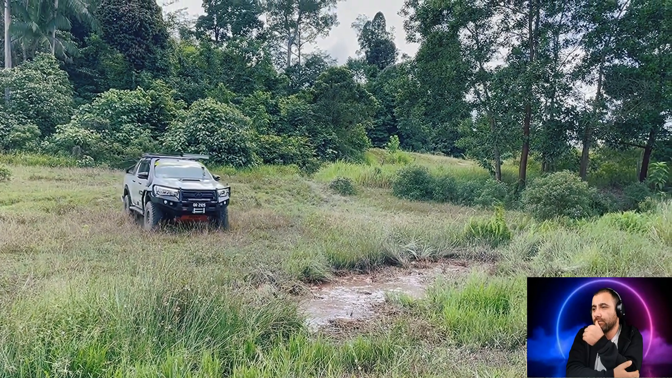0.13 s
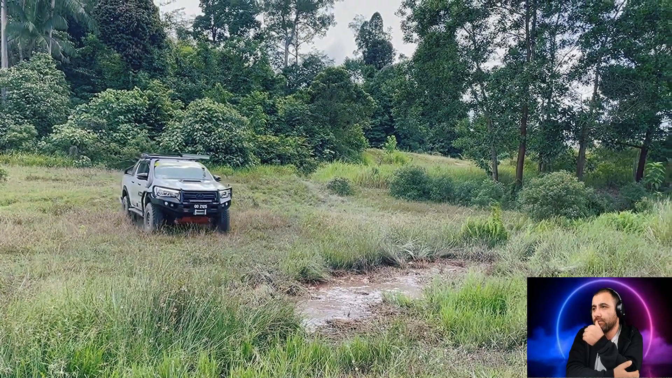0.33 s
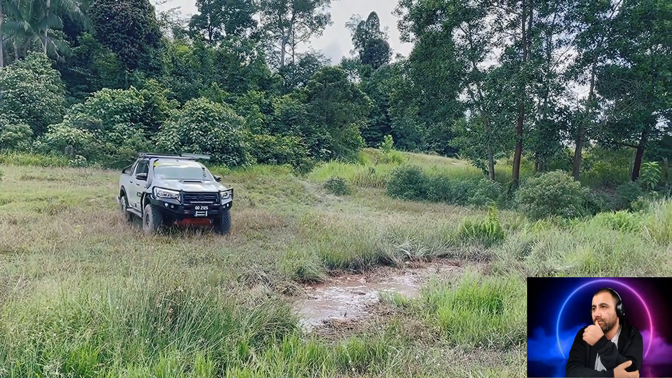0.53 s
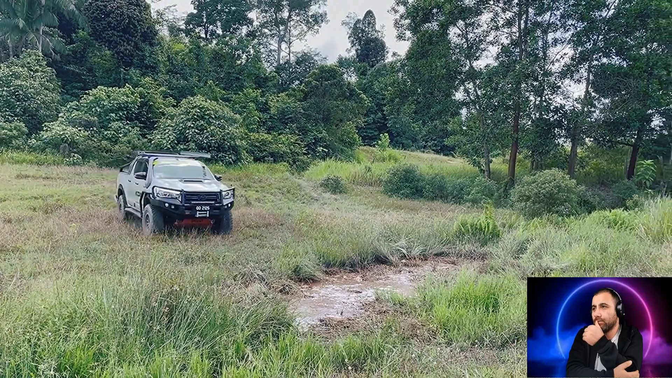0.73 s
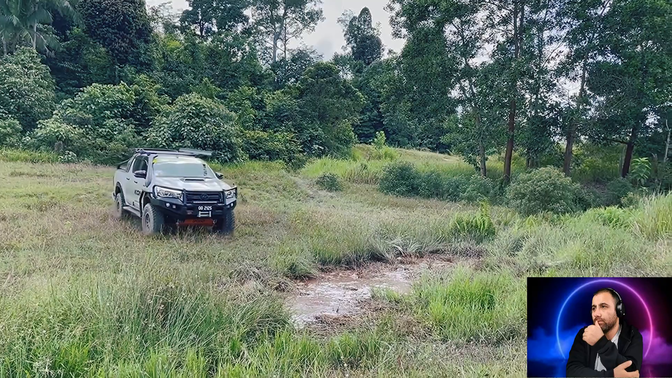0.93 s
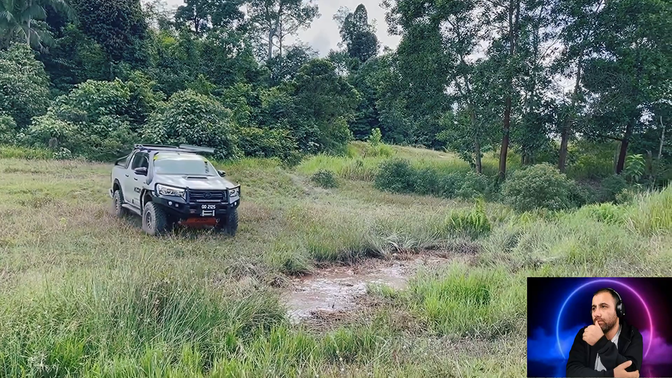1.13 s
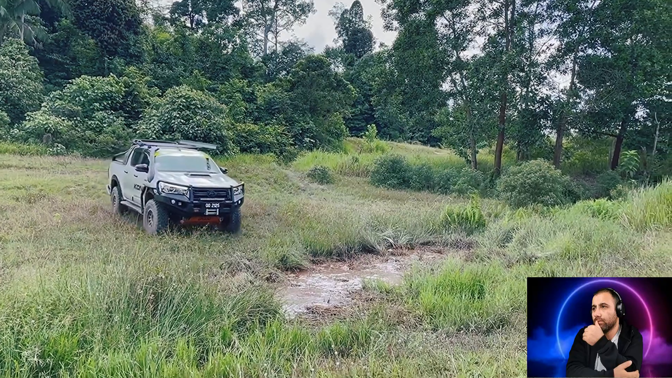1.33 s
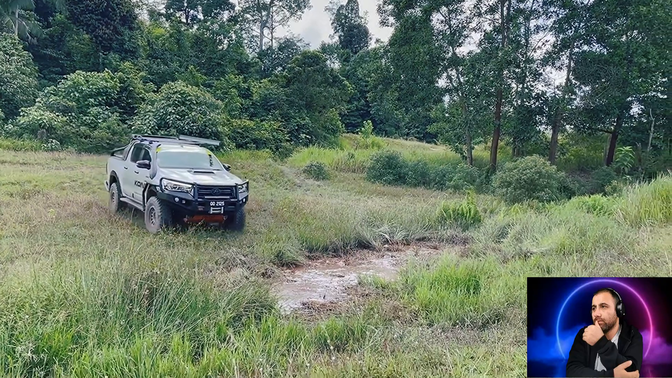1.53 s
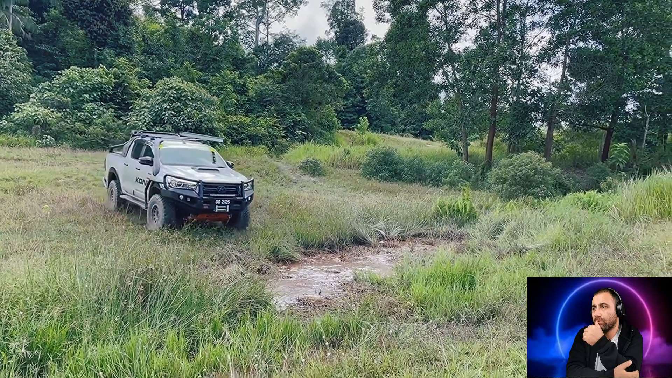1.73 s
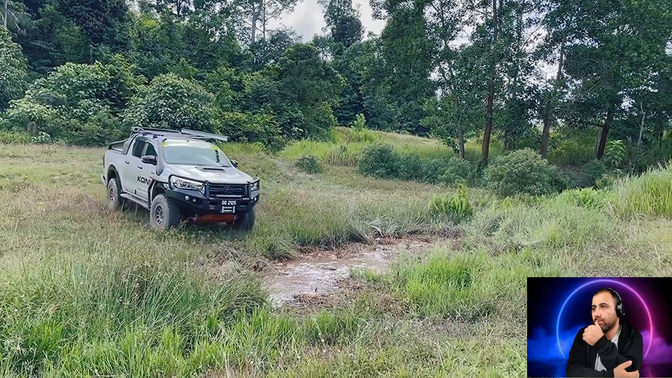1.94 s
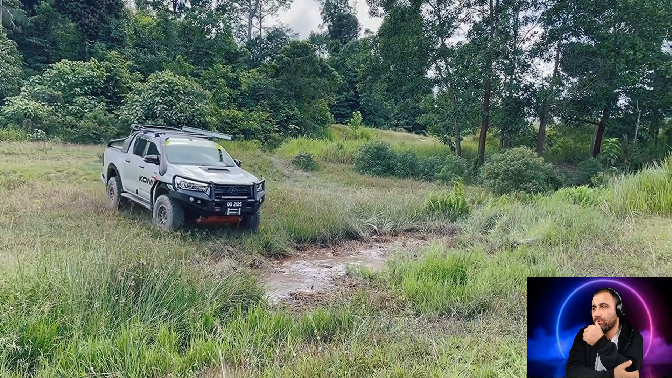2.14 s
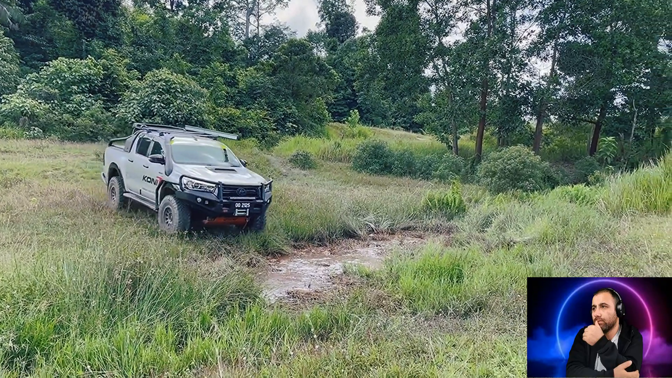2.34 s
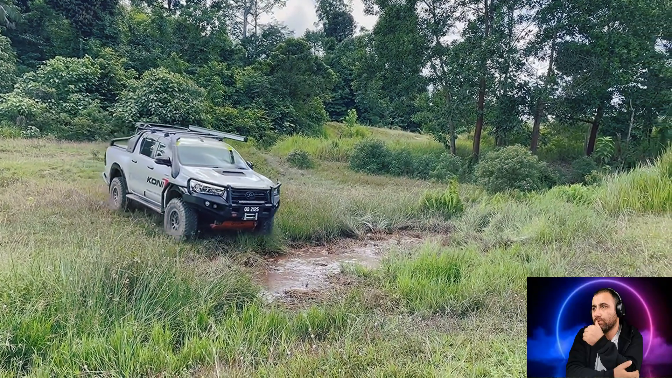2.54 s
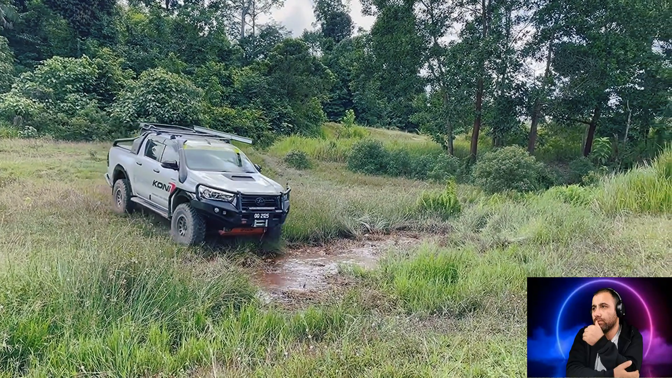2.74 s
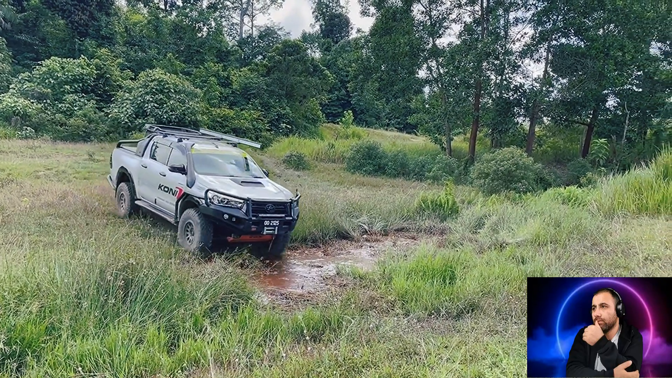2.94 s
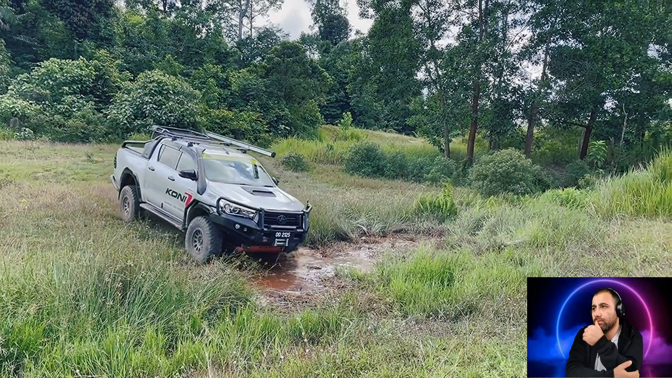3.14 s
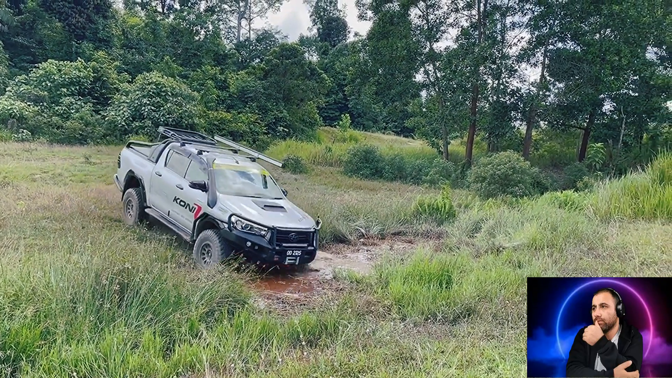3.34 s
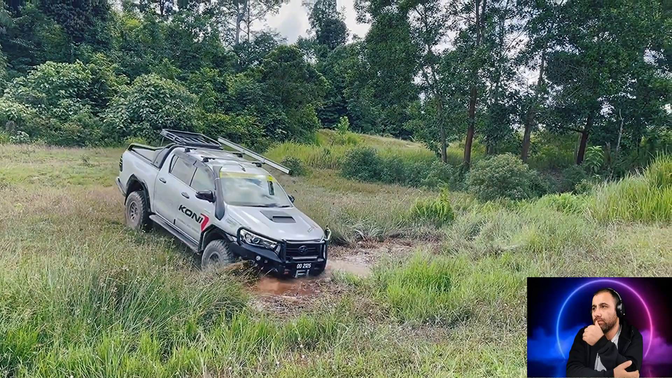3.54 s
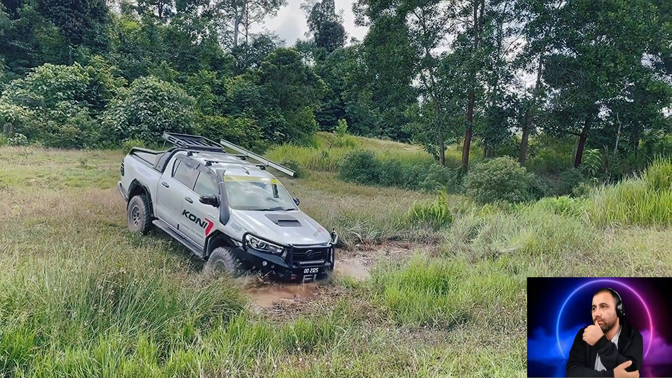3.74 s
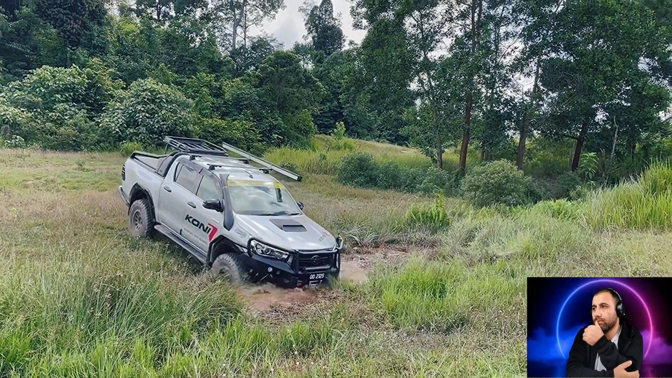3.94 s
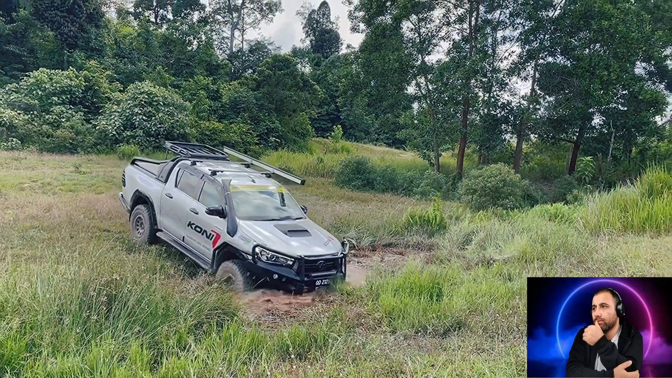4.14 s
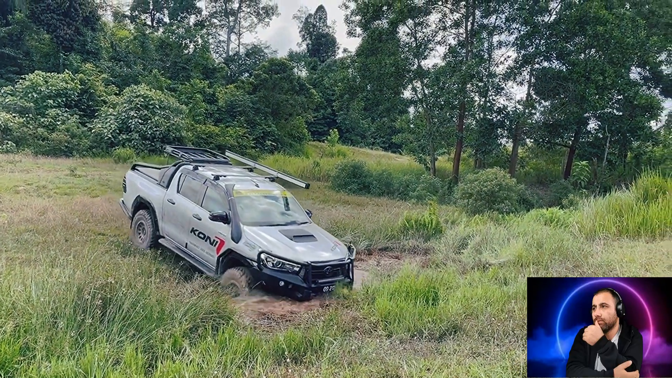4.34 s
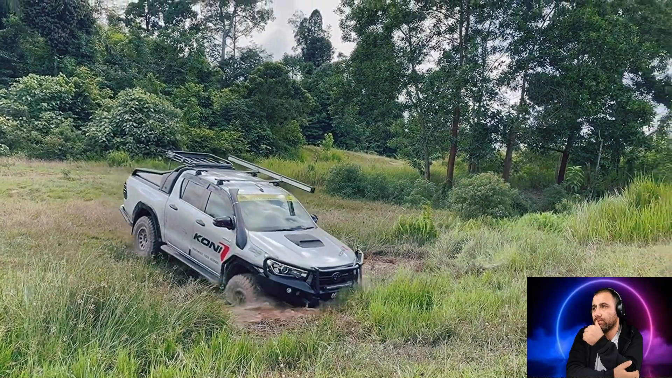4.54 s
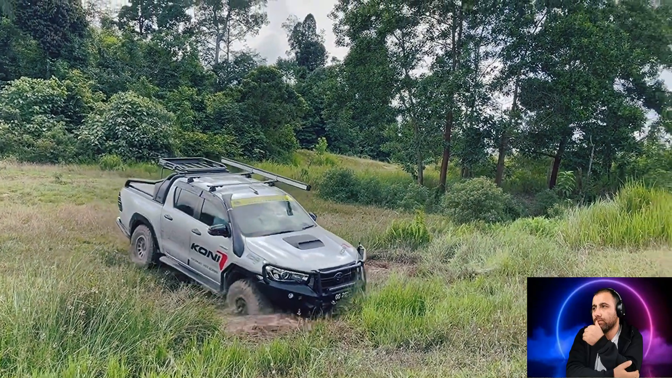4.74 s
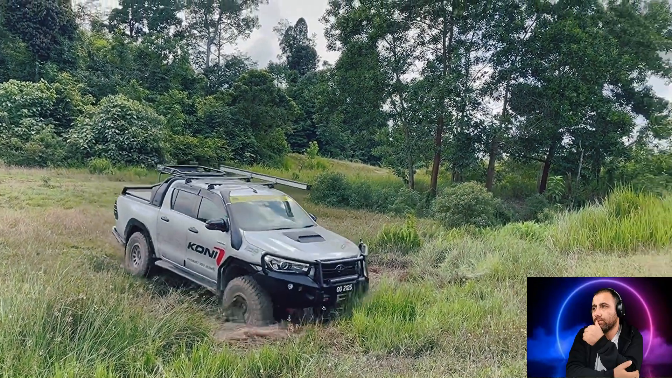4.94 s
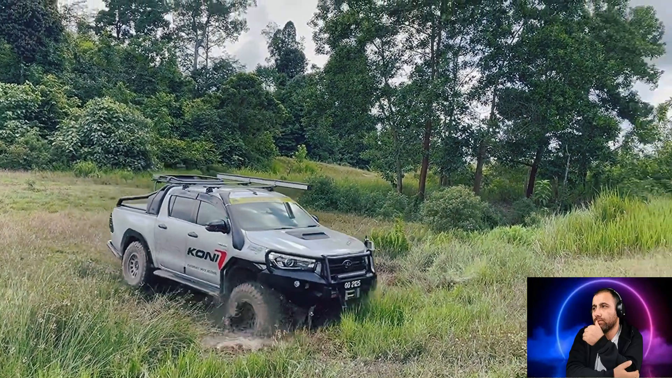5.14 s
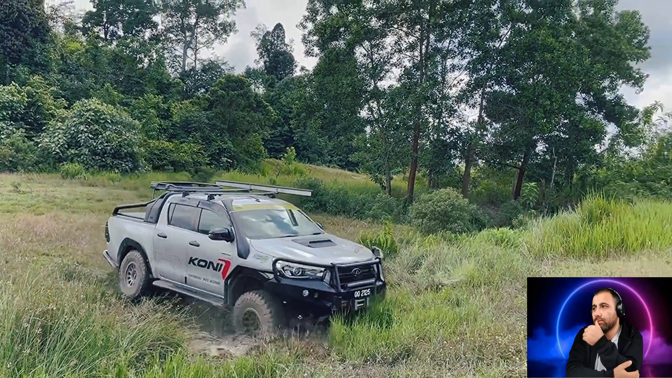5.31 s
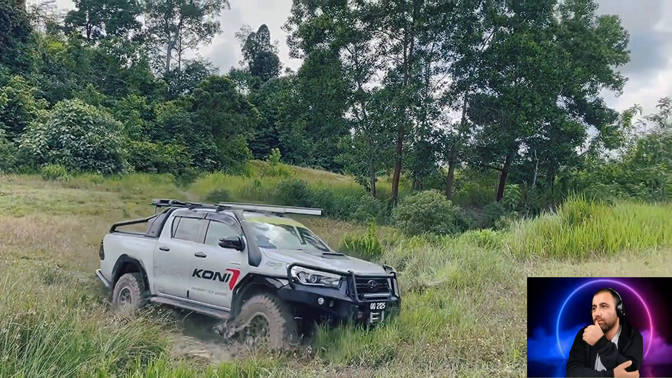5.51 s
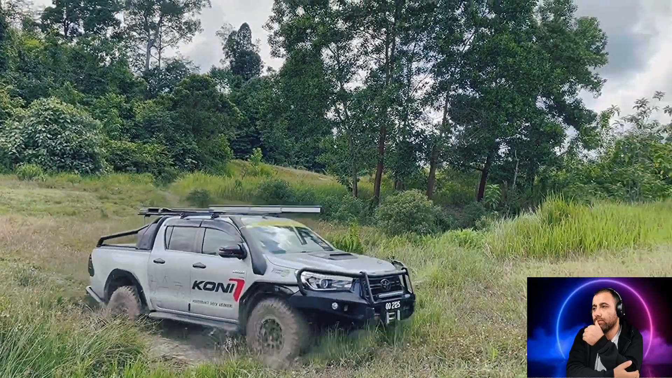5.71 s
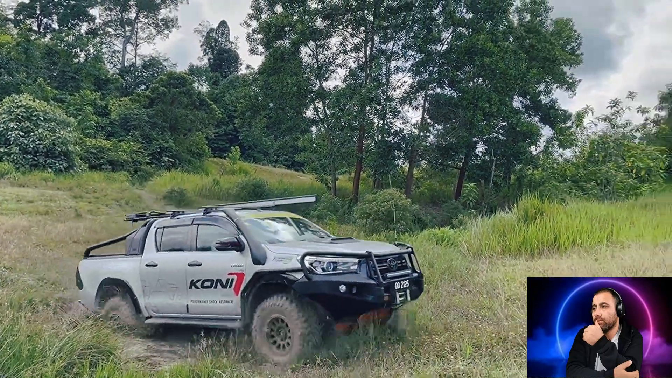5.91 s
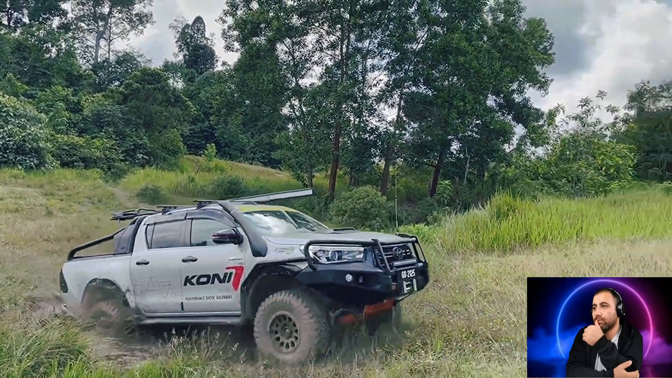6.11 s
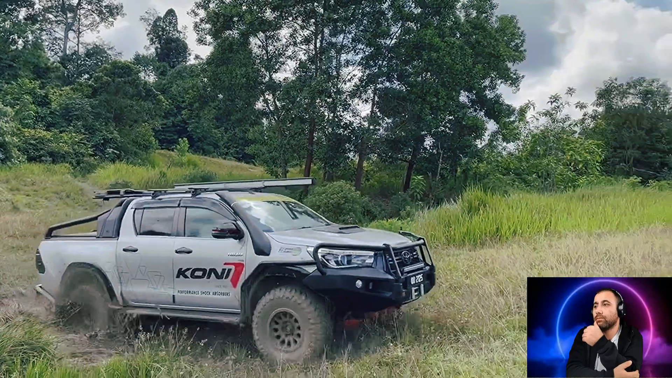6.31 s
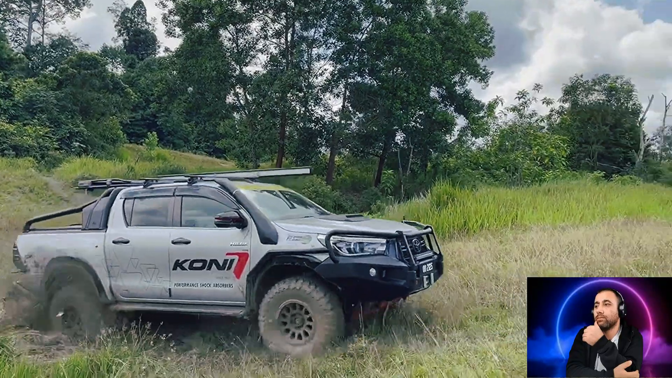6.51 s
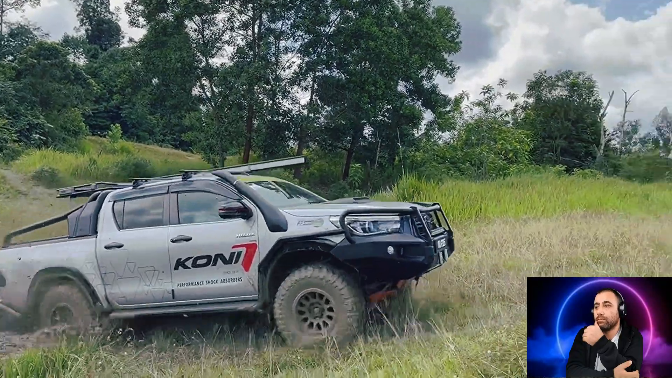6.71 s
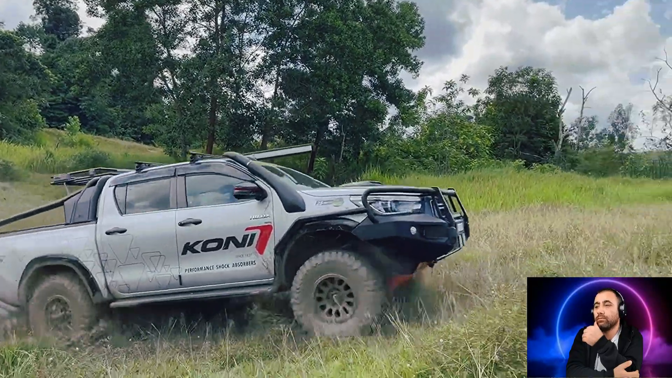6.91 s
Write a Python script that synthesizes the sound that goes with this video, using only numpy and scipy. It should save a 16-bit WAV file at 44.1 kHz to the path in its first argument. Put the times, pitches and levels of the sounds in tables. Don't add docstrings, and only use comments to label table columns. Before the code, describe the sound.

A phone in open grass picks up a distant diesel ticking and knocking, revving gently and settling. Around three seconds sharp muddy smacks and watery spatter break in, followed by a dull axle knock. The motor labours, then revs hard into a deep, uneven roar, growing far louder and nearer. Wet wash, spray and bright grassy hiss surround it, with a cluster of low thumps near the end and no reverberant room.

```python
import sys
import numpy as np
from scipy import signal
from scipy.fft import rfft, irfft, next_fast_len
from scipy.io import wavfile
from scipy.ndimage import uniform_filter1d, map_coordinates

SR = 44100
rng = np.random.default_rng(int(sys.argv[2]) if len(sys.argv) > 2 else 0)


def to_wav(sig):
    pcm = np.clip(np.atleast_2d(sig), -1, 1) * 32767
    pcm = np.round(pcm).astype(np.int16)
    wavfile.write(sys.argv[1], SR, pcm.T)


def gain_from_db(level_db):
    decades = np.asarray(level_db, float) / 20
    return 10 ** decades


N = 307022

IDLE_HZ, IDLE_DB = 52, -45
# start in seconds, peak in dB, t60 in seconds.
SLAPS = [
    (3.021, -16.5, 0.036),
    (3.071, -17, 0.032),
    (3.247, -12, 0.053),
    (3.419, -17, 0.057),
    (3.499, -20, 0.053),
    (3.618, -31, 0.043),
    (3.81, -19, 0.036),
    (4.902, -31, 0.046),
]


def unit(x):
    return x / np.sqrt(np.mean(x ** 2) + 1e-20)


def along(points, hz):
    f, v = np.transpose(points)
    return np.interp(np.log(hz + 1), np.log(f + 1), v)


def curves(rows):
    s, *cols = np.transpose(rows)
    return [np.interp(np.arange(N) / SR, s, c) for c in cols]


def wobble(rate_hz):
    knots = rng.standard_normal(int(N * rate_hz / SR) + 4)
    return map_coordinates(knots, [np.arange(N) * rate_hz / SR])


def filtered(x, response):
    m = next_fast_len(N + SR // 2)
    return irfft(rfft(x, m) * response(np.fft.rfftfreq(m, 1 / SR)), m)[..., :N]


def resonant(modes):
    def response(f):
        return sum((-1) ** k * gain_from_db(db) * 1j * f * w / (c * c - f * f + 1j * f * w)
                   for k, (c, w, db) in enumerate(modes))
    return response


def pair(patchy_db):
    # frequency in Hz, left-right likeness (0-1).
    likeness = [(60, 1), (130, 0.99), (290, 1), (640, 0.97), (1410, 0.94), (3100, 0.87), (6820, 0.59),
                (15000, 0.85)]
    hz, _, z = signal.stft(rng.standard_normal((2, N)), SR, nperseg=512)
    field = uniform_filter1d(rng.standard_normal(z.shape[1:]), size=6, axis=0)
    field = uniform_filter1d(field, size=12, axis=1)
    turn = np.arccos(np.clip(along(likeness, hz), -1, 1))[:, None] / 2
    z = z * gain_from_db(patchy_db * unit(field)) * np.array([np.cos(turn), np.sin(turn)])
    mid, side = signal.istft(z, SR, nperseg=512)[1][:, :N]
    return np.array([mid + side, mid - side])


def coloured(x, spectrum):
    return unit(filtered(x, lambda hz: gain_from_db(along([(9.2, -90)] + spectrum, hz))))


def tone(hz, db, unsteady_db):
    level = gain_from_db(db + unsteady_db * wobble(12))
    return level * np.sqrt(2) * np.sin(2 * np.pi * np.cumsum(hz) / SR)


def law(rule, boom_hz, load_db):
    idle_db, db_per_octave, db_per_load_db = rule
    return idle_db + db_per_octave * np.log2(boom_hz / IDLE_HZ) + db_per_load_db * (load_db - IDLE_DB)


def lurches():
    # centre in seconds, boom change in dB, drone change in dB.
    lurch_rows = [
        (3.04, .5, 2.5),
        (5.23, 1, 0),
        (5.31, 1.5, -4),
        (5.66, 0, 5),
        (5.8, 1, 1),
        (5.96, 5.5, 2),
        (6.165, -5, -1),
        (6.26, -2.5, 6),
        (6.33, -5, .6),
        (6.88, 5, 8.5),
    ]
    width_s, t = 0.044, np.arange(N) / SR
    return sum(np.outer([boom_db, drone_db], np.exp(-((t - s) / width_s) ** 2))
               for s, boom_db, drone_db in lurch_rows)


def pulls():
    # start in seconds, end in seconds, start pitch in Hz, end pitch in Hz, level over the load in dB.
    pull_rows = [
        (.28, .72, 160, 195, -.5),
        (.72, 1.4, 197, 145, -4.5),
        (4.06, 4.79, 131, 180, -3),
        (4.95, 5.24, 256, 290, -6),
        (5.35, 7, 303, 280, -18),
    ]
    fade_s, t = 0.12, np.arange(N) / SR
    knots_s = [row[k] for row in pull_rows for k in (0, 1)]
    knots_hz = [row[k] for row in pull_rows for k in (2, 3)]
    hz = np.interp(t, knots_s, knots_hz)
    gain = sum(gain_from_db(db) * np.clip(np.minimum(t - start, end - t) / fade_s, 0, 1)
               for start, end, _, _, db in pull_rows)
    return hz, 20 * np.log10(gain + 1e-3)


def engine():
    # time in seconds, boom (twice the firing rate) in Hz, boom in dB, load heard as growl in dB.
    revs_load = [(0, 53.75, -48, -52.5), (.4, 65.5, -57, -42), (.75, 72.76, -63, -34.5),
                 (1.2, 63.5, -62, -38), (1.5, 52.68, -53, -44.5), (2.3, 51.9, -45.5, -45),
                 (3.05, 50.74, -49.5, -46.5), (3.85, 49.3, -49, -37), (4.5, 59.1, -37, -28),
                 (4.75, 70.26, -48, -27), (4.92, 85.2, -28.5, -24.5), (5.12, 97.1, -26.5, -24),
                 (5.33, 121.8, -21, -25), (5.62, 140.3, -21.5, -22), (5.97, 133, -19, -22),
                 (6.38, 115.3, -21.5, -20.5), (6.8, 114.4, -19.5, -21), (6.96, 96, -36, -20)]
    # time in seconds, pitch in Hz.
    hum_pitch = [(0, 71), (1, 70), (2.3, 75.74), (2.9, 76.2), (3.7, 68.66), (6.96, 67.92)]
    # time in seconds, effort (0-1).
    effort_rows = [(0, .6), (.3, 1), (1.1, 1), (1.65, 0), (2.95, 0), (3.2, .9), (6.96, 1)]
    # time in seconds, level in dB.
    block_swell = [(0, -6), (.45, 0.5), (1.1, 0), (1.4, -3), (1.6, 1), (2.8, 1), (3, -4.5), (3.2, 0), (6.6, 0),
                   (6.96, 7)]
    # frequency in Hz, level over the load in dB.
    octave_rows = [(105, -16), (145, -6), (200, -14), (270, -13)]
    # frequency in Hz, width in Hz, level in dB.
    cab_modes = [(49, 41, -11), (75.2, 14, -2.5), (116, 12, 0.5)]
    pipe_modes = [(153, 31.2, -1.5), (226.2, 61.6, -4.5), (271.8, 40, -4), (424, 105, -11)]
    block_modes = [(726, 160, -6.5), (1260, 150, -6), (1740, 360, -16), (2174, 98, -15), (2930, 440, -18)]
    sump_modes = [(557, 36, 1), (685, 120, -13)]
    roar_modes = [(524, 174, 1), (777, 200, 0.5), (1085, 340, -10.5), (1425, 240, -10.5), (2290, 960, -22)]
    # level at tick-over in dB, dB per octave of revs, dB per dB of load.
    drone_law = (-38.5, 2, .01)
    clatter_law = (-47.5, 13.15, 0.2)
    hum_law = (-41.5, -12, .01)

    boom_hz, boom_db, growl_db = curves(revs_load)
    boom_lurch_db, drone_lurch_db = lurches()
    boom_db = boom_db + boom_lurch_db
    octave_db = growl_db + along(octave_rows, 2 * boom_hz)
    clatter_db, hum_db = law(clatter_law, boom_hz, growl_db), law(hum_law, boom_hz, growl_db)
    strain_db = .023 * np.maximum(growl_db - IDLE_DB, 0) ** 2
    drone_db = law(drone_law, boom_hz, growl_db) + drone_lurch_db + strain_db

    boom_hz = boom_hz * (1 + .011 * wobble(14))
    firing = np.cumsum(boom_hz / 2) / SR
    count = firing.astype(int)
    since = firing - count
    cylinder_db = np.array([0, -1.5, .7, -1.2])[count % 4]
    strength = gain_from_db(cylinder_db + 1.5 * rng.standard_normal(count[-1] + 1)[count])
    pulses = unit(np.diff(count, prepend=0) * strength)

    hum_hz, = curves(hum_pitch)
    moan_hz, moan_over_db = pulls()
    moan_db = moan_over_db + growl_db
    lines = tone(boom_hz, boom_db, unsteady_db=1.4)
    lines += tone(2 * boom_hz, octave_db - 3, unsteady_db=5.0)
    lines += tone(hum_hz * (1 + 0.0275 * wobble(10)), hum_db - 0.5, unsteady_db=2.0)
    lines += tone(moan_hz * (1 + 0.0251 * wobble(14)), moan_db, unsteady_db=1.5)

    drone_power = gain_from_db(drone_db) ** 2
    drone_gain = np.sqrt(np.maximum(drone_power - gain_from_db(boom_db) ** 2 - gain_from_db(hum_db) ** 2, 0.41 * drone_power))
    drone = unit(filtered(0.2 * pulses + pair(patchy_db=0), lambda f: resonant(cab_modes)(f)
                          / (1 + (42 / (f + 1)) ** 4) / (1 + (f / 160) ** 4)))
    growl_power = gain_from_db(growl_db - 0.34) ** 2 - gain_from_db(moan_db) ** 2 - gain_from_db(octave_db) ** 2
    growl_gain = np.sqrt(np.maximum(growl_power, 0.58 * gain_from_db(growl_db) ** 2))
    growl = unit(filtered(0.38 * pulses + pair(patchy_db=0.97), lambda f: resonant(pipe_modes)(f)
                          / (1 + (f / 420) ** 4) / (1 + (110 / (f + 1)) ** 4)))

    effort, = curves(effort_rows)
    knock = .6 + 5 * strength * since / .2 * np.exp(-since / .2)

    def ring(x, modes):
        return unit(filtered(x, lambda f: resonant(modes)(f) / (1 + (420 / (f + 1)) ** 6)))

    clatter = ring(knock * pair(patchy_db=1.1), block_modes)
    clatter = unit(0.68 * clatter + ring((1.7 + knock) * pair(patchy_db=1.8), sump_modes))
    roar = ring((3 + knock) * pair(patchy_db=1.0), roar_modes)
    block = gain_from_db(clatter_db - 1.0) * (np.sqrt(1 - .9 * effort) * clatter + np.sqrt(effort) * roar)

    since_crest = firing - firing[round(2.47 * SR)]
    lope = 1 + 0.35 * (1 - 0.78 * effort) * np.cos(np.pi / 2 * since_crest)
    return gain_from_db(curves(block_swell)[0]) * block + lope * (lines + drone_gain * drone) + growl_gain * growl


def meadow():
    # frequency in Hz, density in dB per Hz.
    leaf_spectrum = [(900, 10), (3000, 1.5), (4200, -7.5), (5200, -1), (6100, -5), (7100, 3.5),
                     (8500, -0.5), (10000, -10), (12700, -4), (15500, -16)]
    air_spectrum = [(25, -6), (40, 0), (60, -16)]
    # time in seconds, level in dB.
    rustle_level = [(0, -62.5), (1.02, -58.5), (1.77, -61.5), (2.6, -61), (2.98, -57.5), (6.96, -62)]
    rustle_gain = gain_from_db(curves(rustle_level)[0] + 6.5 + 0.84 * wobble(4.95))
    rustle = rustle_gain * coloured(pair(patchy_db=2.1), leaf_spectrum)
    return rustle + gain_from_db(-70) * coloured(pair(patchy_db=2.0), air_spectrum + [(90, -90)])


def ground(x):
    # time in seconds, echo delay in ms, echo share (0-1).
    echo_path = [(0, 2.03, .62), (.8, 2.09, .48), (1.4, 2.2, .56), (2.8, 2.2, .52), (4.5, 2.19, .66),
                 (5.3, 2.17, .6), (5.5, 2.17, .28), (6.96, 2.17, .28)]
    delay_ms, share = curves(echo_path)
    band = filtered(x, lambda hz: 1 / (1 + (1520 / (hz + 1)) ** 8) / (1 + (hz / 2850) ** 12))
    n = np.arange(N)
    late = n - delay_ms * (1 + .006 * wobble(2.5)) * SR / 1000
    echo = np.array([np.interp(late, n, side) for side in band])
    share = np.clip(share + .12 * wobble(1.5), 0, 1)
    return x + share * echo - (1 - 1 / np.sqrt(2)) * band


def wetness():
    # time in seconds, level in dB.
    churn_level = [(3.005, -80), (3.03, -40), (3.23, -48), (3.28, -37.5), (3.6, -40.5), (4.04, -44),
                   (4.41, -40), (4.97, -33), (5.18, -28), (5.43, -26.5), (5.69, -23), (5.87, -26.5),
                   (6.3, -26), (6.96, -25)]
    # start in seconds, wash in dB, spray in dB, t60 in seconds.
    splash_rows = [(3.015, -32, -52, 0.61), (3.04, -34, -38.5, .3), (3.075, -35, -48, .35),
                   (3.24, -33, -43, 0.23), (3.41, -37, -42.5, 0.68), (3.47, -38, -39.5, 1.6),
                   (3.775, -39.5, -42.5, 1.1), (5.38, -32, -48, .2), (5.95, -34, -33, 1.6),
                   (6.37, -44, -33.5, 1.1), (6.52, -33, -30.5, .8)]
    rise_s, t = 0.01, np.arange(N) / SR
    churn_db, = curves(churn_level)
    hiss_db = -37 + 1.24 * (churn_db + 28)
    power = gain_from_db([churn_db, hiss_db]) ** 2
    for s, wash_db, spray_db, t60_s in splash_rows:
        age = np.maximum(t - s, 0)
        envelope = np.minimum(age / rise_s, 1) * gain_from_db(-60 * age / t60_s)
        power = power + np.outer(gain_from_db([wash_db, spray_db]), envelope) ** 2
    return np.sqrt(power)


def grains(per_s, spread_db):
    hits = (rng.random(N) < per_s / SR) * gain_from_db(spread_db * rng.exponential(size=N))
    return unit(signal.fftconvolve(hits, np.exp(-np.arange(400) / 60))[:N])


def droplets(count):
    draw = rng.random((count, 3))
    t = np.arange(300) / SR
    hz = 900 * 5.56 ** draw[:, 1:2]
    envelope = np.exp(-t * hz / 4) * (1 - np.exp(-t * hz * 2))
    plop = gain_from_db(6.3 * draw[:, 2:]) * np.sin(2 * np.pi * hz * t * (1 + 25 * t)) * envelope
    where = (draw[:, :1] * N).astype(int) + np.arange(300)
    return unit(np.bincount(where.ravel(), plop.ravel(), N + 300)[:N])


def wheels():
    # frequency in Hz, density in dB per Hz.
    wash_spectrum = [(500, -17), (900, 4), (1400, 2), (1850, -2), (2300, -11), (3500, -9), (5000, -17.5),
                     (7000, -58)]
    hiss_spectrum = [(2000, 14), (3500, -0.5), (5000, 2.5), (6000, 3), (7000, -0.5), (8500, 3),
                     (10000, -0.5), (11300, 5.5), (13000, 0.5), (15500, -23)]
    wash_gain, hiss_gain = wetness()
    spatter = 3.0 + 0.23 * grains(per_s=220, spread_db=2.0)
    churn = gain_from_db(0.41 * wobble(9.9))
    wash = coloured(spatter * pair(patchy_db=1.0), wash_spectrum) + 0.28 * droplets(count=2500)
    hiss = coloured(spatter * pair(patchy_db=1.0), hiss_spectrum)
    return churn * (wash_gain * wash + gain_from_db(2.5) * hiss_gain * hiss)


def slaps():
    # frequency in Hz, density in dB per Hz.
    smack_spectrum = [(600, -25), (900, -13), (1400, 8.5), (1900, 0), (3500, -1.5), (5500, -18),
                      (8000, -28)]
    # start in seconds, level in dB, pitch in Hz.
    jolt_rows = [
        (3.735, -26, 70),
        (3.808, -19, 260),
        (3.853, -24, 120),
        (5.66, -15, 60),
        (6.114, -11, 150),
        (6.198, -10, 170),
        (6.222, -9, 150),
        (6.247, -11, 110),
        (6.276, -12, 130),
        (6.87, -14, 120),
    ]
    ring_cycles, rise_s = 7, .002
    t, wet, jolt = np.arange(SR // 4) / SR, np.zeros(N + SR), np.zeros(N + SR)
    for s, db, t60_s in SLAPS:
        wet[round(s * SR):][:len(t)] += gain_from_db(db - 11 - 60 * t / t60_s) * (1 - np.exp(-t / 0.0026))
    for s, db, hz in jolt_rows:
        envelope = gain_from_db(db - 60 * t * hz / ring_cycles) * (1 - np.exp(-t / rise_s))
        jolt[round(s * SR):][:len(t)] += envelope * np.sin(2 * np.pi * hz * t)
    return wet[:N] * coloured(pair(patchy_db=3.0), smack_spectrum) + jolt[:N]


def scene():
    # time in seconds, side level in dB.
    side_level = [(0, 7.5), (2.9, 7), (3.3, 6), (5, 1.5), (6.96, 3.5)]
    left, right = ground(engine() + meadow() + wheels() + slaps())
    mid, side = (left + right) / 2, (left - right) / 2 * gain_from_db(curves(side_level)[0])
    return np.array([mid + side, mid - side])


def hollowed(x, under_db, fickle_db):
    hz, _, z = signal.stft(x, SR, nperseg=1024)
    power = uniform_filter1d(np.sum(np.abs(z) ** 2, axis=0), size=5, axis=1)
    narrow, broad = (np.abs(uniform_filter1d(power, size=k, axis=0)) for k in (3, 25))
    whim = uniform_filter1d(rng.standard_normal(power.shape), size=3, axis=0)
    whim = unit(uniform_filter1d(whim, size=12, axis=1))
    eager_db = whim * fickle_db * ((hz > 3000) & (hz < 7900))[:, None]
    sunk = narrow < broad * gain_from_db(-2 * (under_db - eager_db))
    dropped = sunk & ((hz > 1450) & (hz < 10500))[:, None]
    return signal.istft(z * ~dropped, SR, nperseg=1024)[1][:, :N]


def whistles():
    # pitch in Hz, start in seconds, end in seconds, level over the hiss in dB, readiness to sound.
    whistle_rows = [
        (13609, 3.25, 7, -19, 1.4),
        (14643, 3.42, 7, -27, -.1),
        (15676, 3.79, 5.21, -19, .9),
    ]
    t, tones = np.arange(N) / SR, np.zeros(N)
    for hz, start, end, db, ready in whistle_rows:
        gate = np.clip(np.minimum(t - start, end - t) / .008, 0, 1)
        flicker = np.clip(8 * (wobble(12) + ready), 0, 1)
        tones += gate * flicker * gain_from_db(db) * np.sin(2 * np.pi * hz * t)
    return tones * wetness()[1] * gain_from_db(1.6 * wobble(11))


def roll_off(x):
    return signal.sosfilt(signal.butter(12, 15790, fs=SR, output="sos"), x)


def record(dry):
    # frequency in Hz, left minus right in dB.
    lean = [(60, 1), (180, 1), (550, 2), (1650, 1.5), (4970, 2), (15000, -1)]
    # frequency in Hz, phase between the ports in radians.
    lead = [(500, -0.029), (1500, 0.31), (2700, 0.82), (3600, 1), (5400, 0.57), (6500, -0.6), (8000, -0.24)]
    # frequency in Hz, width in Hz, depth (0-1).
    dip_rows = [(5800, 100, .4), (7640, 260, .97), (10150, 100, .45)]
    narrow_s, narrow_hz = 3.25, 13150
    n = np.arange(N)

    def ports(hz):
        gain = gain_from_db(np.outer([.5, -.5], along(lean, hz)))
        return gain * np.exp(1j * np.outer([.5, -.5], along(lead, hz)))

    def dip_loss(hz):
        return 1 - np.prod([1 - d * np.exp(-((hz - c) / w) ** 4) for c, w, d in dip_rows], axis=0)

    x = filtered(dry, ports)
    x = x - filtered(x, dip_loss) * np.where(n > SLAPS[0][0] * SR, 1, .6)
    x = hollowed(x, under_db=4.3, fickle_db=2.6)
    top = filtered(x, lambda hz: hz > narrow_hz)
    x = x - top * (n > narrow_s * SR) * (1 - gain_from_db(-45)) + whistles()
    return roll_off(x)


dry = scene()
out = record(dry)
to_wav(out)
```